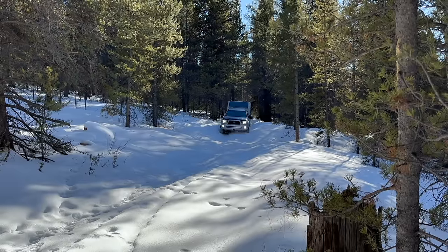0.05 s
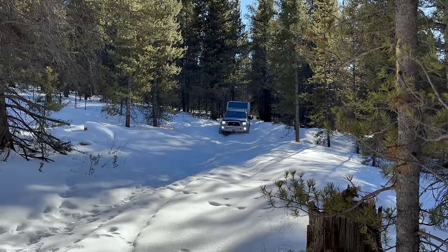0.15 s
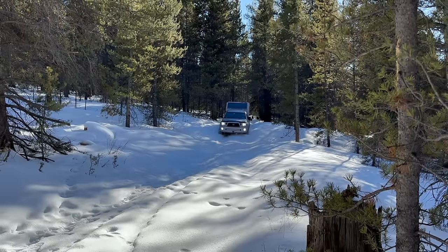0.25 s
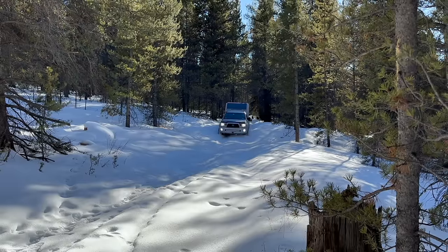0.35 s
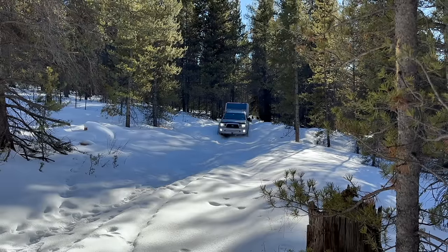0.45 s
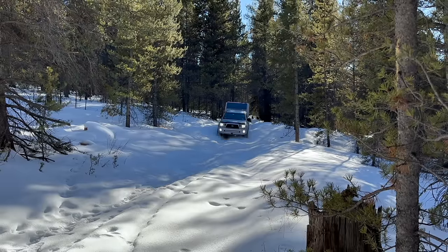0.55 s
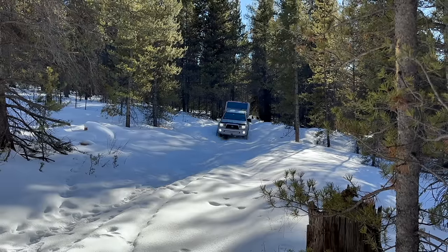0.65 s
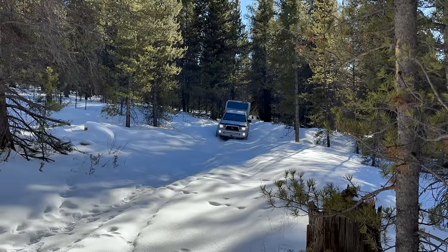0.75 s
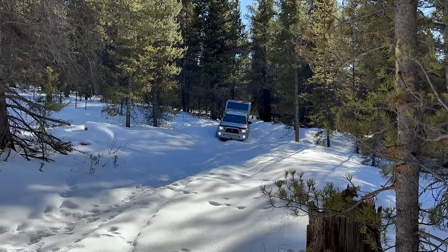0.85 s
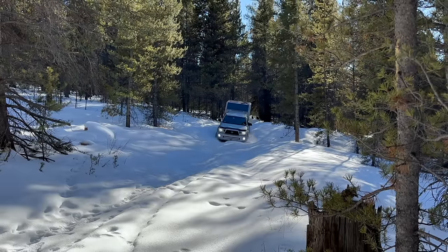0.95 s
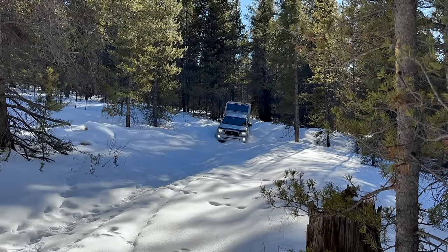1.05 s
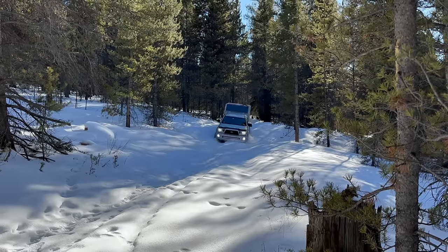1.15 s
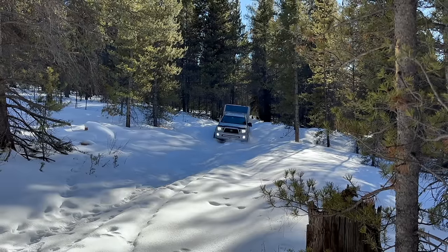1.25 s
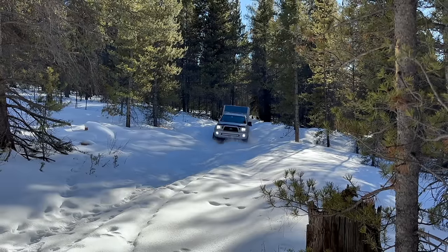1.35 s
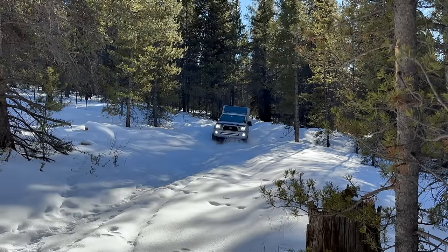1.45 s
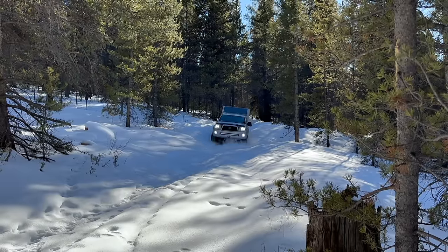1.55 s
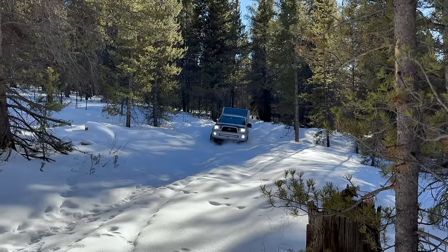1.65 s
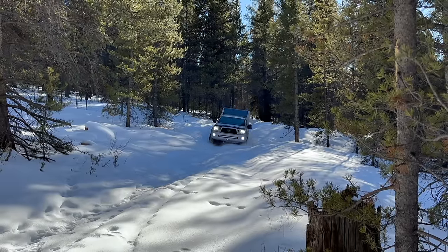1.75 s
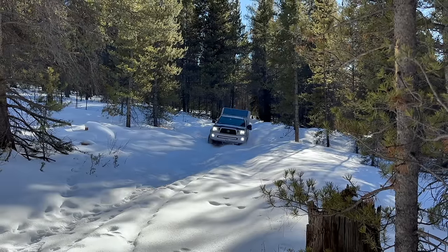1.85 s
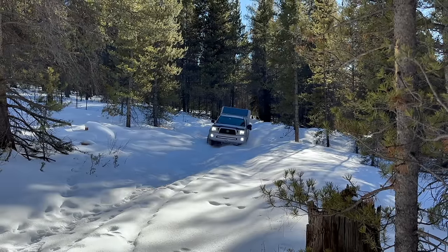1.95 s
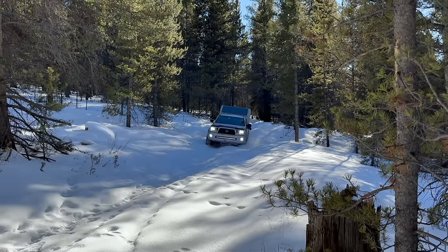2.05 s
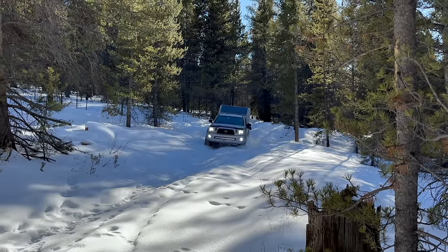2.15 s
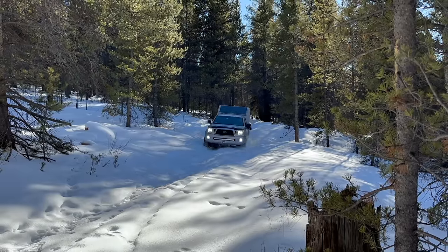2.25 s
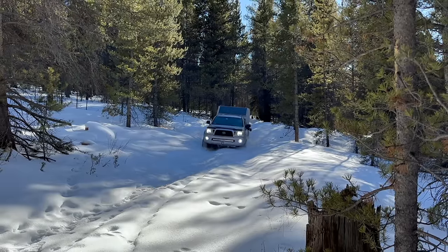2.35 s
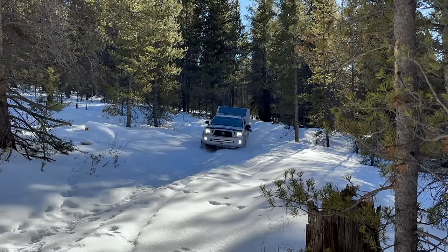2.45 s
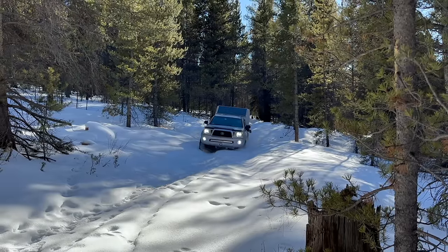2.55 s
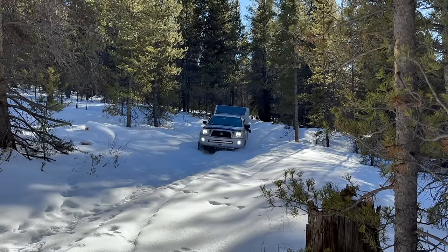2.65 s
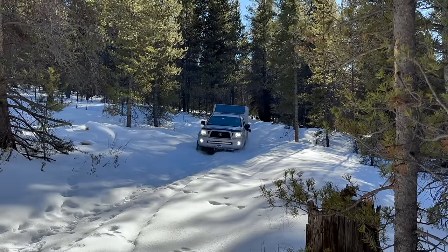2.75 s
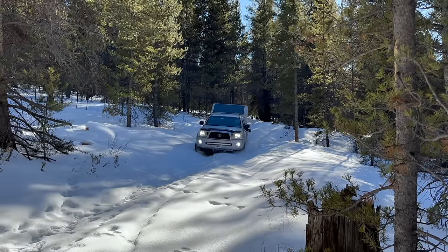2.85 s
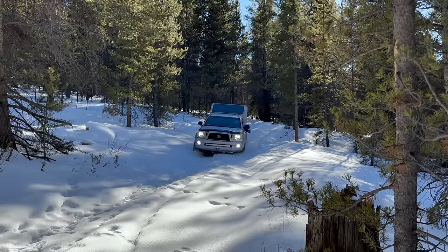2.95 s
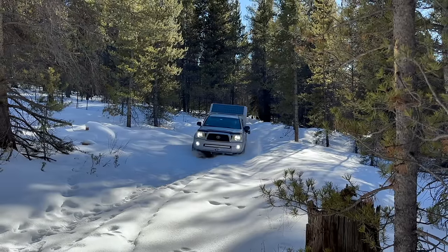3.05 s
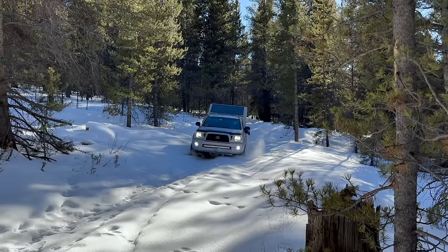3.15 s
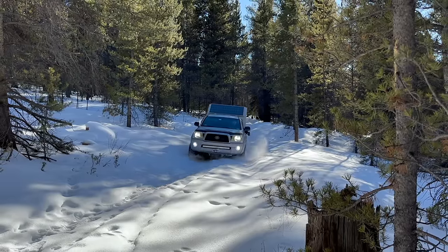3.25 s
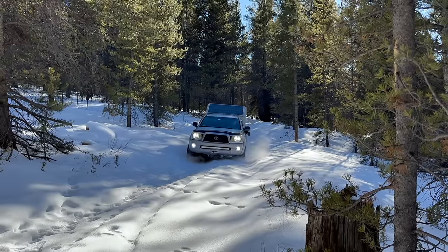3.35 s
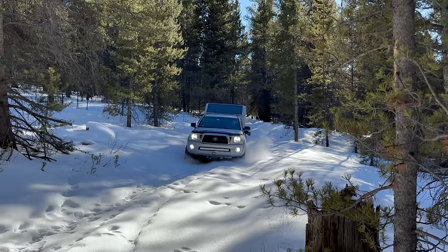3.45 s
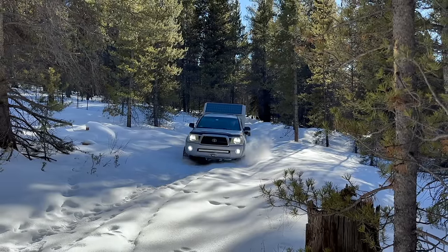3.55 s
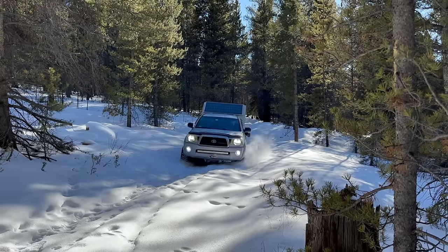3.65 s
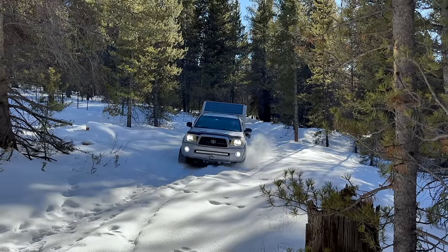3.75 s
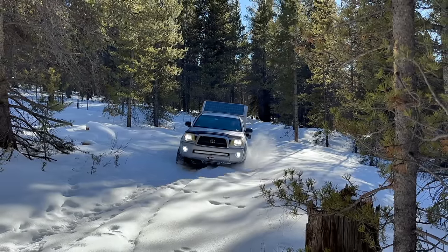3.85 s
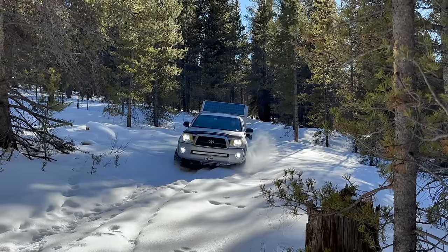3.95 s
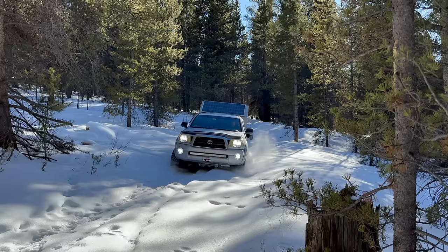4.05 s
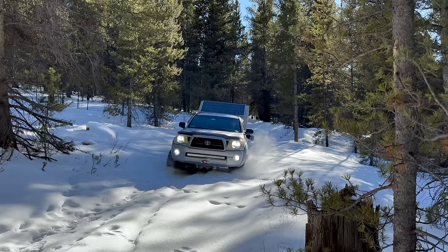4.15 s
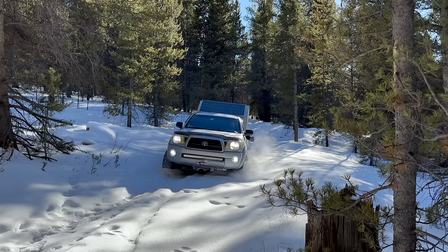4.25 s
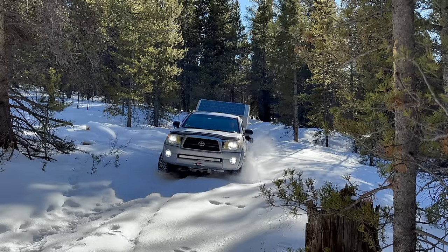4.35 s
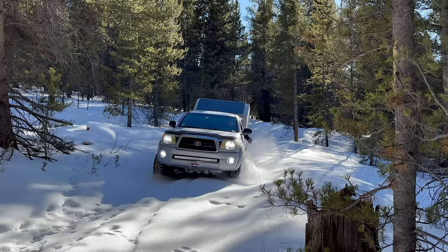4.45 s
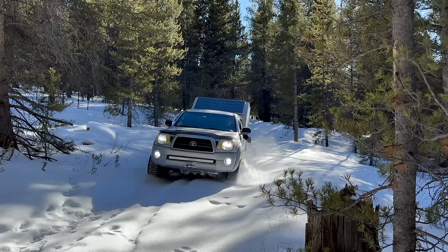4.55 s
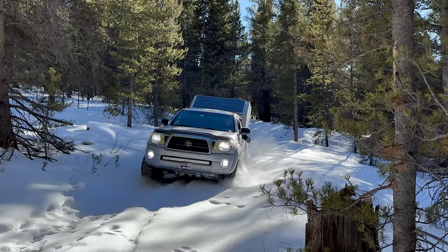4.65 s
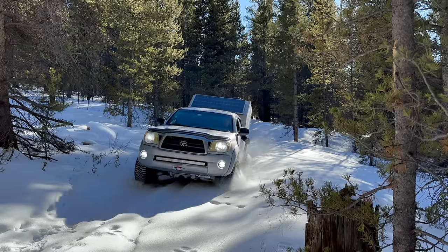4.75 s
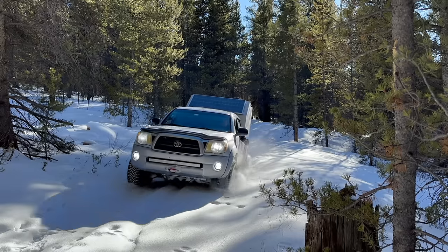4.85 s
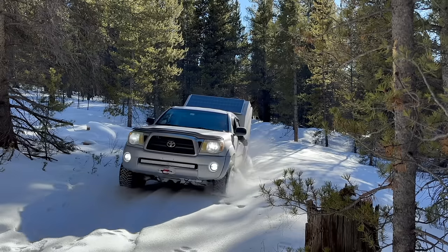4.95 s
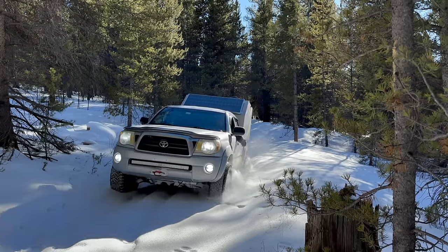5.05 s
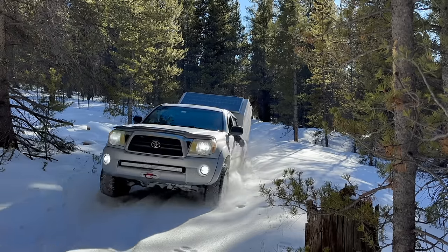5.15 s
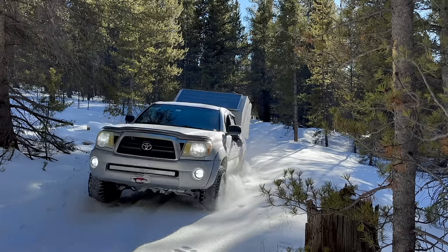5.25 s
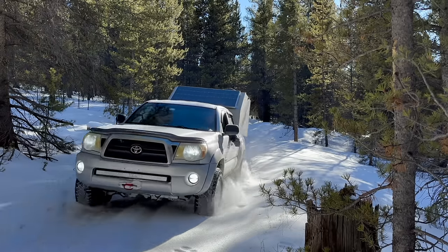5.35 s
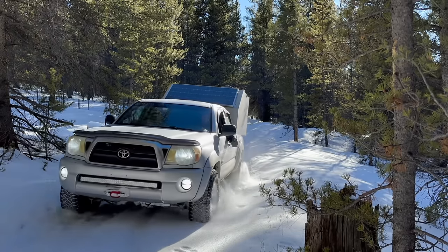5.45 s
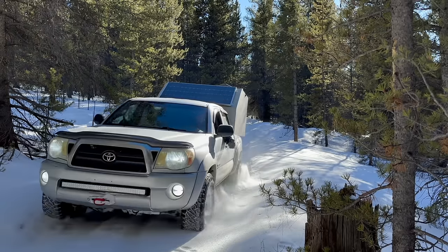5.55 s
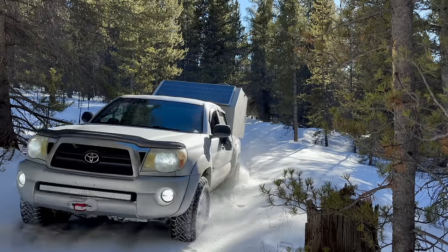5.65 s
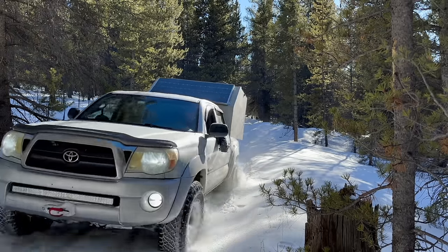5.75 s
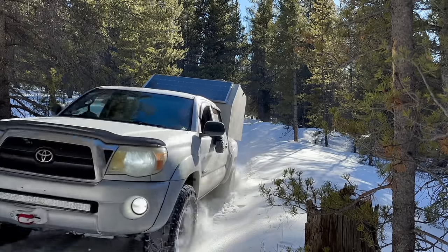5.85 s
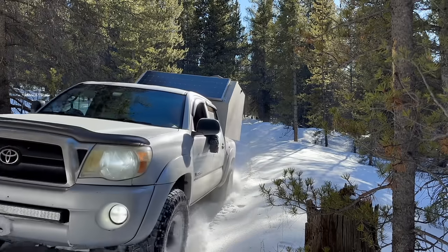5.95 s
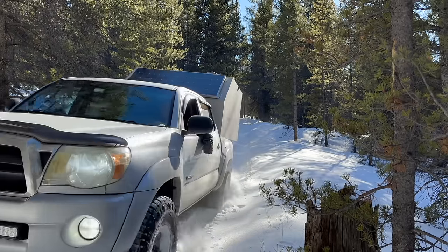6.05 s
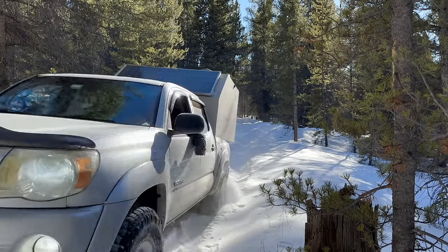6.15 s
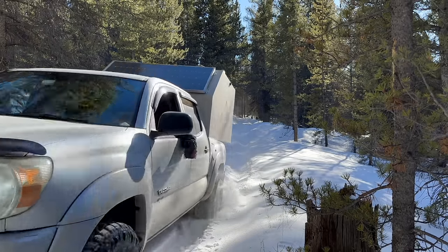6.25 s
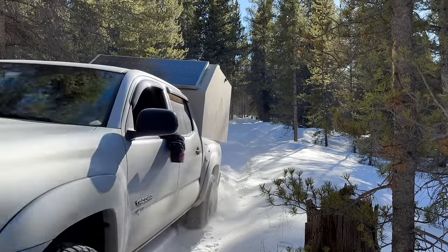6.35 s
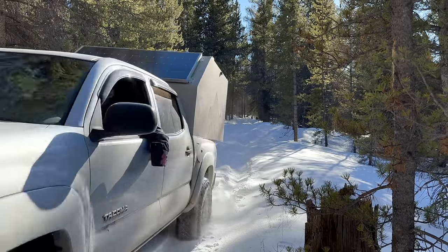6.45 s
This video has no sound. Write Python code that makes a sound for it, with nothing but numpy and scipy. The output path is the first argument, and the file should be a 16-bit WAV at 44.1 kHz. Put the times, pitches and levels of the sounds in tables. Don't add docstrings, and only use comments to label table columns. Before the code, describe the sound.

A pickup climbs a snow-covered forest track towards a fixed stereo microphone outdoors. Its engine races unevenly at first, with a brief whine, then settles into a lower, harder exhaust boom. Body rumble and knocks come from the ruts. Tyre hiss and snow crunch grow steadily, turning loud and bright as the truck passes close on the left at the end.

```python
import sys
import numpy as np
from scipy import signal
from scipy.fft import rfft, irfft
from scipy.io import wavfile

SR = 44100
rng = np.random.default_rng(int(sys.argv[2]) if len(sys.argv) > 2 else 0)


def how_loud(loudness_db):
    steps = np.asarray(loudness_db, float) / 20
    return 10 ** steps


def persist_wave(psi):
    counts = np.round(np.clip(psi, -1, 1) * 32767).astype(np.int16)
    wavfile.write(sys.argv[1], SR, np.atleast_2d(counts).T)


N = 286650
TIME = np.arange(N) / SR
HZ = np.arange(N // 2 + 1) * SR / N

# (order, level [dB], share of nearness, share of throttle, share of bay level)
CRANK_ORDERS = [(1.0, -53, -1.1, 0.59, 0.21), (2.0, -38.5, 0.38, 1, 0.17), (3.0, -37.0, 1.43, 1, -0.18),
                (4.0, -49, 1.92, -0.89, -0.25), (5.0, -50.0, 1.01, 0.054, 0.88),
                (6.0, -53.5, 0.41, 0.44, 0.76), (7.0, -52.5, -0.2, 0.65, 1.0),
                (8.0, -56.5, -0.15, -0.5, 0.42)]


def rms_one(x):
    return x / np.sqrt(np.mean(x ** 2) + 1e-20)


def in_time(rows):
    s, *columns = np.transpose(rows)
    return [np.interp(TIME, s, column) for column in columns]


def at_hz(points, hz):
    table_hz, values = np.transpose(points)
    return np.interp(np.log(hz + 1), np.log(table_hz + 1), values)


def swell(middle_s, length_s, order=2):
    return np.exp(-((TIME - middle_s) / (0.75 * length_s)) ** order)


def drift(rate):
    r = np.exp(-80 * np.pi * rate / SR)
    slow = signal.lfilter([1], [1, -2 * r, r * r], rng.standard_normal(N // 40 + 2002))
    slow = rms_one(slow[2000:])
    return np.interp(np.arange(N) / 40, np.arange(len(slow)), slow)


def resonance(x, hz, width_hz):
    r = np.exp(-np.pi * width_hz / SR)
    zeros = np.array([1, 0, -1]) * (1 - r * r) / 2
    return signal.lfilter(zeros, [1, -2 * r * np.cos(2 * np.pi * hz / SR), r * r], x)


def at_ports(direct):
    # (frequency [Hz], level [dB])
    left_level = [(60, -0.5), (110, 2.5), (200, 0), (380, 1), (700, 2), (1290, 2), (2380, -2.5), (4400, -2),
                  (8120, 0.5), (15000, 0)]
    # (frequency [Hz], lead [rad])
    left_lead = [(500, 0), (1550, -.4), (2070, 0), (3600, 1.1), (5000, .9), (6200, .8), (7200, 1.7),
                 (7700, 2.6), (8400, 2.8), (9300, 1.25), (11300, 0), (13000, 0), (13400, -.7),
                 (15700, -2.2)]
    half = how_loud(at_hz(left_level, HZ) / 2) * np.exp(.5j * np.interp(HZ, *np.transpose(left_lead)))
    return irfft(rfft(direct) * np.array([half, 1 / half]), N)


def noise(spectrum, shared_db, own_db, rate):
    # (frequency [Hz], share)
    direct_share = [(60, .99), (500, .93), (1500, .85), (2100, .92), (3600, .73), (5100, .62), (5700, .35),
                    (6700, .76), (7800, .84), (8700, .62), (9300, .86), (10900, .9), (11300, 1), (13000, 1),
                    (13400, .8)]
    direct = np.clip(at_hz(direct_share, HZ), 0, 1)
    alike = rfft(at_ports(rng.standard_normal(N)))
    scattered = rfft(rng.standard_normal((2, N)))
    low_hz, high_hz = spectrum[0][0], spectrum[-1][0]
    mix = np.sqrt(direct) * alike + np.sqrt(1 - direct) * scattered
    mix = mix * how_loud(at_hz(spectrum, HZ)) * ((HZ > low_hz) & (HZ < high_hz))
    octave = np.log2((HZ + 1) / low_hz)
    together = drift(rate)
    out = 0
    for k in range(int(np.log2(high_hz / low_hz)) + 2):
        band = np.cos(np.pi / 2 * np.clip(octave - k, -1, 1)) ** 2
        out = out + irfft(mix * band, N) * how_loud(shared_db * together + own_db * drift(rate))
    return rms_one(out)


def passing(x, share, lag_share=1):
    # (time [s], extra left level [dB], extra right lag [ms])
    pan = [(0, 0, 0), (3, 0, 0), (4.5, 1.3, .035), (5.4, 2.3, .062), (5.9, 3.6, .075), (6.15, 4.4, .09),
           (6.4, 5.2, .15), (6.5, 5.3, .16)]
    pan_db, lag_ms = in_time(pan)
    late = np.interp(np.arange(N) - lag_share * lag_ms * SR / 1000, np.arange(N), x[1])
    return np.array([x[0], late]) * how_loud(share * pan_db * np.array([[.5], [-.5]]))


def drive_uphill():
    # (time [s], speed [turns/s])
    crank_speed = [(0, 46.4), (.33, 51.3), (.65, 49), (.8, 54.7), (1.03, 64.2), (1.25, 60.3), (1.7, 62.6),
                   (2.2, 49.6), (2.32, 51), (2.62, 44), (3.05, 45.2), (3.9, 44), (4.3, 40.6), (4.9, 48.8),
                   (5.3, 44.5), (5.5, 46.1), (6.13, 45.5), (6.5, 40)]
    # (time [s], level [dB])
    throttle = [(0.0, -0.5), (0.3, -6), (0.7, -1), (1.05, -6.5), (1.35, -1.5), (1.65, -3.5), (1.95, 3),
                (2.4, 6), (2.6, 0.6), (3.15, 3.5), (3.4, 2), (4.35, -1.5), (4.85, 7), (5.35, 4), (5.6, 4.5),
                (6.15, 2.5), (6.3, -4), (6.5, -7.5)]
    # (time [s], level [dB])
    bay_level = [(0, 6), (.15, 6.5), (.6, 6.5), (.85, 8), (1.1, 6), (1.6, 7), (1.85, 4), (2.2, 2),
                 (3, -1.5), (3.9, -4), (4.3, -7), (4.9, -1.5), (5.5, 2), (5.95, 5), (6.25, 9.5), (6.5, 7.5)]
    # (time [s], level [dB])
    tyre_effort = [(0, -1.5), (.38, 1.5), (.65, 0), (1, 4.5), (1.25, 2), (1.6, 4), (2.1, 0.5), (2.9, -2.5),
                   (3.8, -3.5), (4.36, -5.5), (4.8, -1), (5.6, 5), (5.9, 10), (6.25, 13), (6.5, 15)]
    speed_m_per_s, abreast_s, miss_m, reference_m = 5, 6.7, 3, 15
    distance_m = np.hypot(speed_m_per_s * (abreast_s - TIME), miss_m)
    speed = in_time(crank_speed)[0]
    turns = np.cumsum(speed) / SR
    return {
        "near": -20 * np.log10(distance_m / reference_m),
        "throttle": in_time(throttle)[0],
        "bay": in_time(bay_level)[0],
        "tyres": in_time(tyre_effort)[0],
        "speed": speed,
        "turns": turns,
        "throb": 1 + 0.051 * np.cos(2 * np.pi * turns),
        "slip": how_loud(0.43 * drift(25)),
        "nose_past": swell(6.42, -0.2),
    }


def level_db(drive, db, near=0, throttle=0, bay=0, tyres=0):
    return (db + near * drive["near"] + throttle * drive["throttle"]
            + bay * drive["bay"] + tyres * drive["tyres"])


def order_levels(drive, rows, path):
    return [level_db(drive, db, near, throttle, bay) + at_hz(path, order * drive["speed"])
            for order, db, near, throttle, bay in rows]


def orders(turns, levels_db, first, spread_rad, waver_db, waver_rad):
    out = 0
    for k, db in enumerate(levels_db):
        level = np.sqrt(2) * how_loud(db + waver_db * (drift(7.9) + drift(29)))
        phase = 2 * np.pi * (first + k) * turns + k * k * spread_rad + waver_rad * drift(13.0)
        out = out + level * np.sin(phase)
    return out


def exhaust(drive):
    # (frequency [Hz], level [dB])
    pipe_path = [(85.0, 4), (105.0, 1), (125.0, -4.5), (155.0, -12.5), (180.0, -3.5), (200.0, -3),
                 (225.0, 9), (250.0, 12.5)]
    levels = order_levels(drive, CRANK_ORDERS[:4], pipe_path)
    return orders(drive["turns"], levels, first=1, spread_rad=-1.25, waver_db=.5, waver_rad=.08)


def thud(drive):
    # (frequency [Hz], level [dB per Hz])
    thud_bands = [(90, -20), (110, -1), (160, -1.5), (210, -9), (280, -20)]
    return how_loud(level_db(drive, -52, near=1.47)) * noise(thud_bands, shared_db=0.5, own_db=1.0, rate=9)


def engine_block(drive):
    # (frequency [Hz], level [dB])
    panel_path = [(215.0, -14.5), (250.0, -4.1), (290.0, 4.5), (330.0, -3.5), (370.0, -1.3), (400.0, -1.3),
                  (435.0, 4), (500.0, -2)]
    # (order, level re the mean of orders 7 and 8 [dB])
    upper_orders = [(9, -0.5), (10, -4.5), (11, -8), (12, -3), (13, -18.5), (14, -11), (15, -42)]
    levels = order_levels(drive, CRANK_ORDERS[4:], panel_path)
    seven_eight_db = (levels[2] + levels[3]) / 2
    levels += [seven_eight_db + db for order, db in upper_orders]
    return how_loud(2.0) * orders(drive["turns"], levels, first=5, spread_rad=.28, waver_db=.7, waver_rad=.15)


def growl(drive):
    # (frequency [Hz], level [dB per Hz])
    growl_bands = [(150, -41), (200, -25), (250, -4), (330, -4), (450, -2), (600, -4.5), (800, -9.5),
                   (1100, -16.5)]
    db = level_db(drive, -40.5 - 3.0, near=0.2137, bay=0.7631, tyres=-0.0667) - 3 * drive["nose_past"]
    return how_loud(db) * drive["throb"] * noise(growl_bands, shared_db=-0.16, own_db=-0.5, rate=4.6)


def roar(drive):
    # (frequency [Hz], level [dB per Hz])
    roar_bands = [(500, -15), (800, -6.5), (1050, -1), (1300, -3.5), (1600, -7), (2000, -7.5), (3000, -30)]
    level = how_loud(level_db(drive, -52 - 0.26, near=-0.02, bay=1.1656, tyres=-0.04)) * np.sqrt(drive["slip"])
    return level * drive["throb"] * noise(roar_bands, shared_db=-0.14, own_db=-0.5, rate=6.8)


def fan_rush(drive):
    # (frequency [Hz], level [dB per Hz])
    rush_bands = [(1100, -24), (1600, -1.5), (2000, -0.5), (2300, -1), (2600, -1), (3100, -4.5),
                  (4200, -10), (6000, -32)]
    db = level_db(drive, -54 + 0.66, near=-0.1955, bay=0.45, tyres=0.15) - 3 * drive["nose_past"]
    return how_loud(db) * drive["throb"] * noise(rush_bands, shared_db=0.2, own_db=.5, rate=9.6)


def body_rumble(drive):
    # (frequency [Hz], level [dB per Hz])
    rumble_bands = [(28, -42), (36, -18), (44, -2), (70, 2.5), (90, 2.5), (120, -9), (150, -19),
                    (200, -17.5), (300, -51)]
    # (time [s], level above the rumble [dB], length [s])
    ruts = [
        (.55, 5.5, 0.17),
        (1.1, -1, 0.11),
        (1.66, -11, 0.11),
        (1.845, 12, 0.074),
        (2.12, -1, .12),
        (2.9, 3, 0.35),
        (3.453, 7, 0.14),
        (3.75, 5, .15),
        (4.24, 3, .2),
        (6.15, 1.5, 0.22),
    ]
    db = level_db(drive, -47 + 3.5, near=0.55, bay=0.28, tyres=0.25)
    db = db + sum(rut_db * swell(s, length_s) for s, rut_db, length_s in ruts)
    return how_loud(db) * noise(rumble_bands, shared_db=4.3, own_db=-3.0, rate=3.1)


def snow_throws():
    # (time [s], fine spray [dB], coarse crunch [dB], length [s])
    throws = [
        (.9, 1, -1, .12),
        (1.8, 1, 1, .1),
        (3.105, 5, 4, 0.15),
        (3.92, 2, 1, .1),
        (5.314, 1.5, 4, 0.038),
        (5.55, 1.5, 2.5, 0.042),
        (5.82, 1.5, 0, .1),
        (6.1, 1.5, -1, 0.21),
        (6.3, 1.5, -0.5, .1),
        (6.405, -1.5, -3, 0.056),
    ]
    return sum(np.array([[fine], [coarse]]) * swell(s, length_s) for s, fine, coarse, length_s in throws)


def snow_spray(drive, fine_db):
    # (frequency [Hz], level [dB per Hz])
    spray_bands = [(5000, -34), (6500, -3.5), (7700, -1.5), (8500, -4.5), (9300, 1), (10300, 2),
                   (11400, -2), (12500, -4.5), (14000, -21)]
    level = how_loud(level_db(drive, -59.5 + 2.5, near=0.09, bay=0.06, tyres=0.837) + fine_db)
    return level * drive["slip"] * noise(spray_bands, shared_db=0.36, own_db=-0.2, rate=20)


def snow_mist(drive, fine_db):
    # (frequency [Hz], level [dB per Hz])
    mist_bands = [(11000, -33), (12500, -6), (13500, -1), (15000, 2), (15800, -1)]
    level = how_loud(level_db(drive, -64.5 + 3.5, near=0.3, bay=-0.02, tyres=0.75) + fine_db)
    return level * drive["slip"] * noise(mist_bands, shared_db=0.3, own_db=0.0, rate=17)


def snow_crunch(drive, coarse_db):
    # (frequency [Hz], level [dB per Hz])
    crunch_bands = [(1500, -5), (3000, 0), (4200, -2), (5100, -2), (5700, -5), (6500, -5), (8500, -8.5),
                    (10000, -33)]
    shadow_hz = 4100
    level = how_loud(level_db(drive, -60 + 3.24, near=0.13, bay=-0.09, tyres=1.1145) + coarse_db)
    crunch = level * drive["slip"] * noise(crunch_bands, shared_db=-1.24, own_db=-1.0, rate=74)
    bright = irfft(rfft(crunch) / (1 + (shadow_hz / (HZ + 1)) ** 12), N)
    coarse_part = how_loud(0.076 * drive["near"]) * (crunch - bright)
    bright_part = how_loud(-0.15 * drive["near"]) * bright
    return passing(coarse_part, share=0.99) + passing(bright_part, share=2.05, lag_share=-.25)


def breeze():
    # (time [s], level [dB])
    breeze_level = [(0, -52), (.45, -59), (.52, -50), (.6, -63), (2, -71), (5.5, -63), (6.1, -56),
                    (6.5, -56)]
    band = signal.butter(2, [28, 110], "band", fs=SR, output="sos")
    low = signal.sosfilt(band, rng.standard_normal((2, N)))
    return how_loud(in_time(breeze_level)[0] + 2.4 * drift(12)) * rms_one(low)


def fan_shroud():
    # (middle [s], length [s], level [dB])
    ring_ups = [
        (1.0, .28, -51.5),
        (1.3, .4, -58),
        (3.95, .9, -62),
    ]
    hz, width_hz = 2550, 360
    ring = resonance(rng.standard_normal(N), hz, width_hz)
    ring = rms_one(resonance(ring, hz, width_hz))
    return sum(how_loud(db) * swell(s, length_s) for s, length_s, db in ring_ups) * ring


def gear_whine():
    # (middle [s], length [s], frequency [Hz], level [dB])
    whines = [
        (1.59, .31, 1056, -46),
        (1.91, .13, 1062, -47),
        (2.4, .08, 1050, -50),
    ]
    unsteady = how_loud(2.4 * drift(20))
    slip_rad = .45 * drift(15)
    out = 0
    for s, length_s, hz, db in whines:
        out = out + how_loud(db) * swell(s, length_s, order=4) * np.sin(2 * np.pi * hz * TIME + slip_rad)
    return unsteady * out


def scene():
    drive = drive_uphill()
    fine_db, coarse_db = snow_throws()
    low = at_ports(exhaust(drive)) + thud(drive) + body_rumble(drive)
    engine_bay = at_ports(engine_block(drive) + fan_shroud() + gear_whine())
    engine_bay = engine_bay + growl(drive) + roar(drive) + fan_rush(drive)
    truck = passing(low, share=0.22) + passing(engine_bay, share=1)
    snow = snow_spray(drive, fine_db) + snow_mist(drive, fine_db) + snow_crunch(drive, coarse_db)
    return truck + snow + breeze()


def low_pass(x):
    return signal.sosfilt(signal.butter(12, 16150, fs=SR, output="sos"), x)


def record(dry):
    mix = irfft(rfft(dry) * (HZ < 15750), N)
    return low_pass(mix)


dry = scene()
out = record(dry)
persist_wave(out)
```